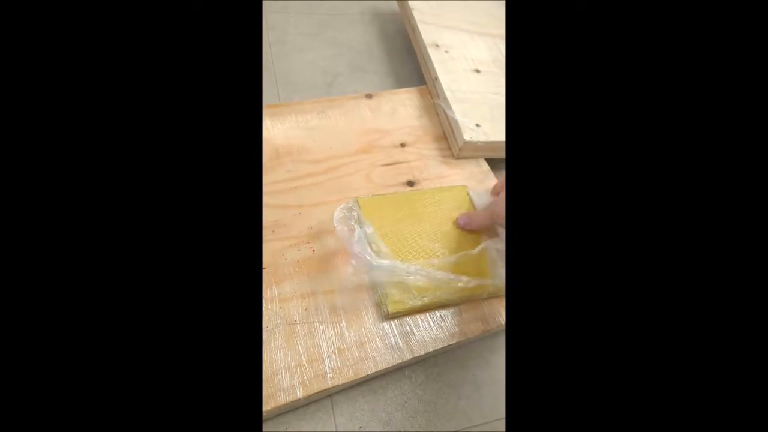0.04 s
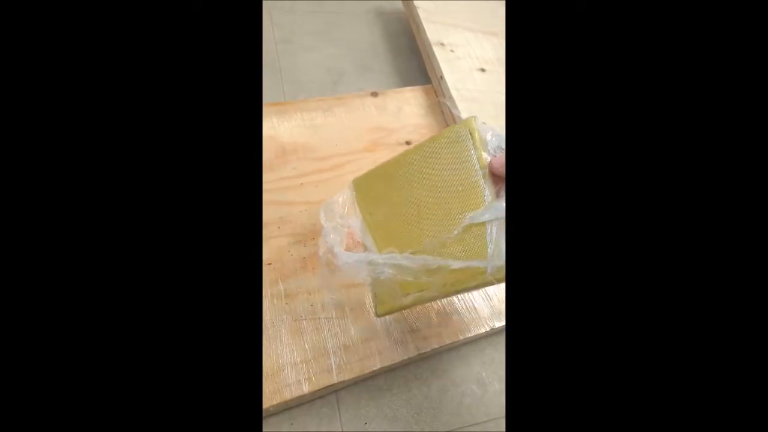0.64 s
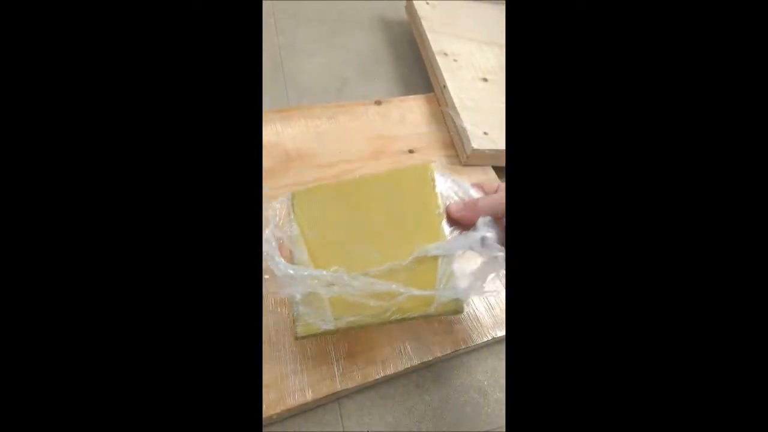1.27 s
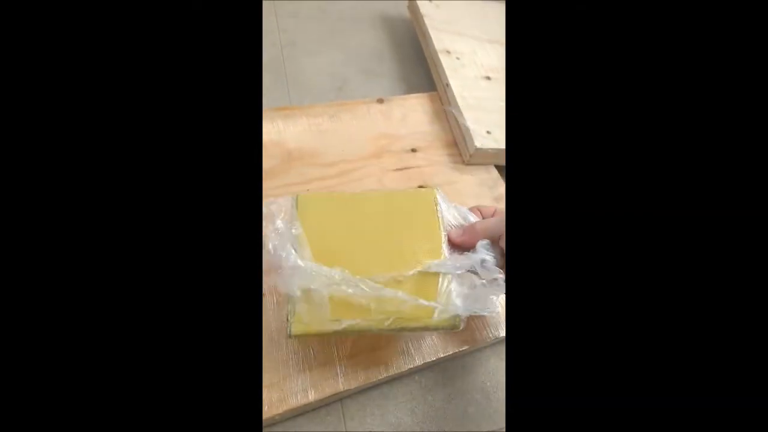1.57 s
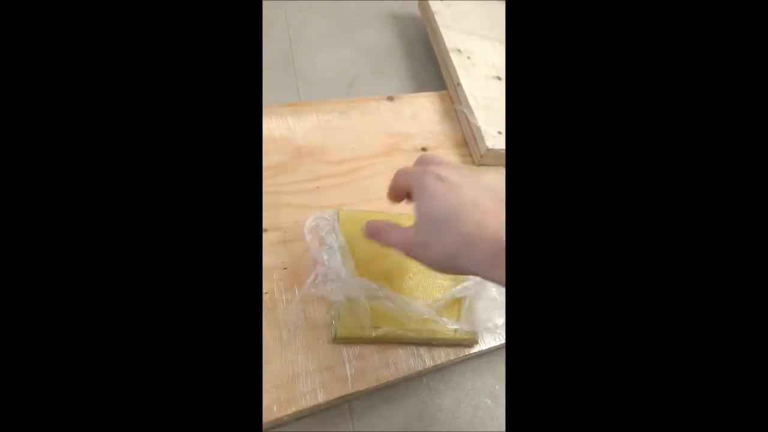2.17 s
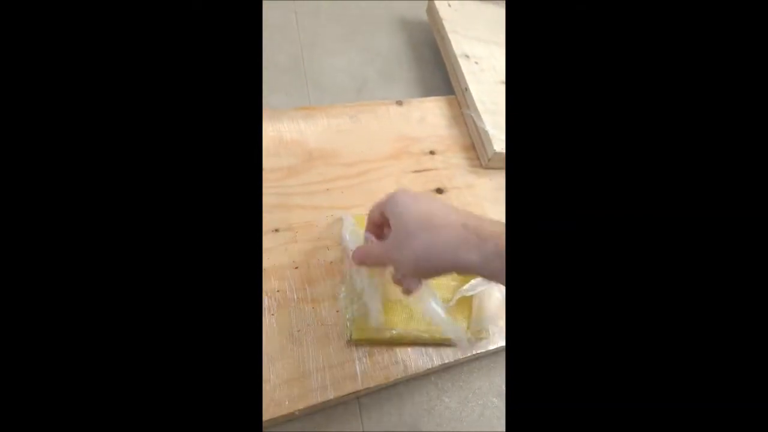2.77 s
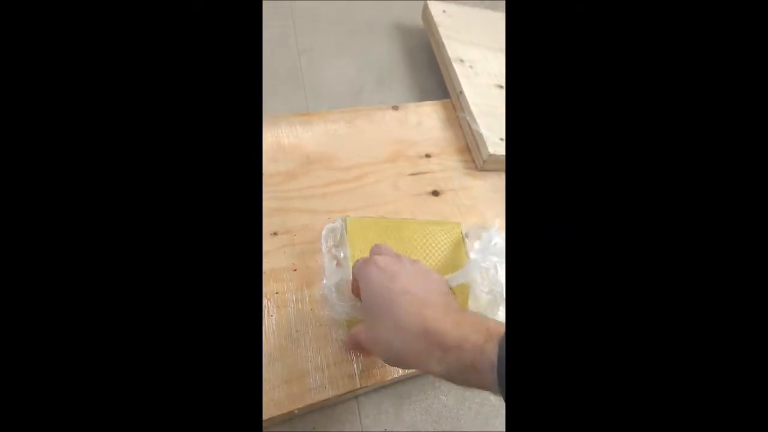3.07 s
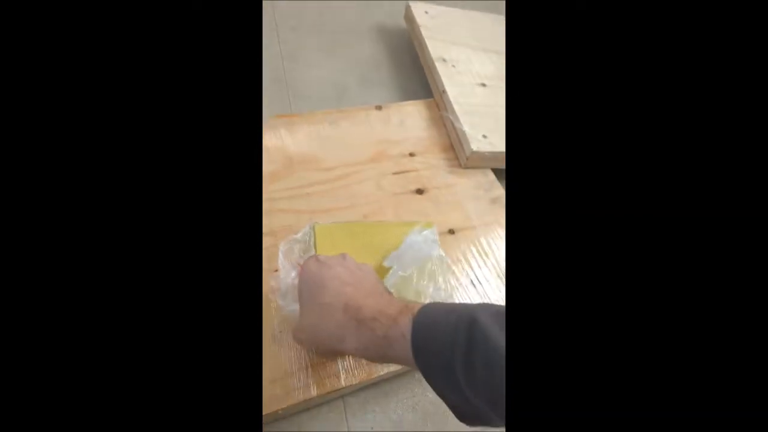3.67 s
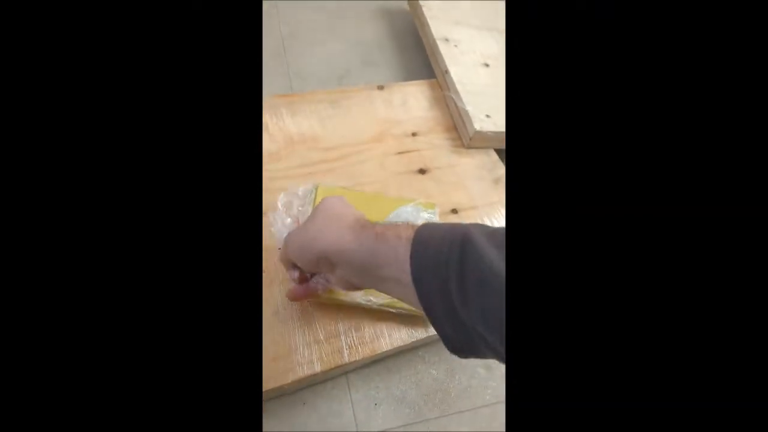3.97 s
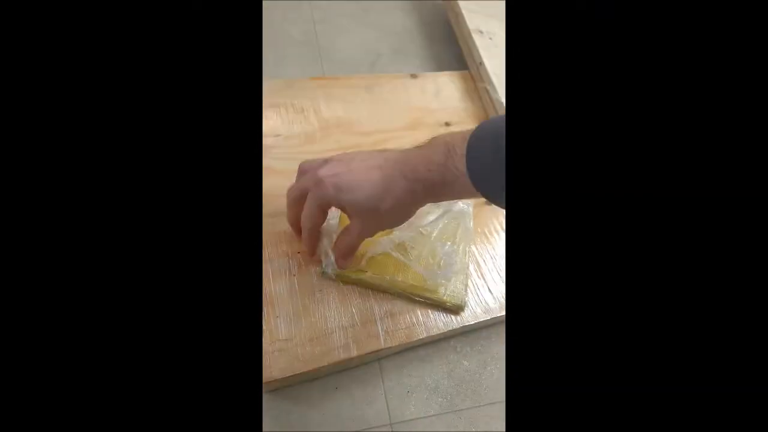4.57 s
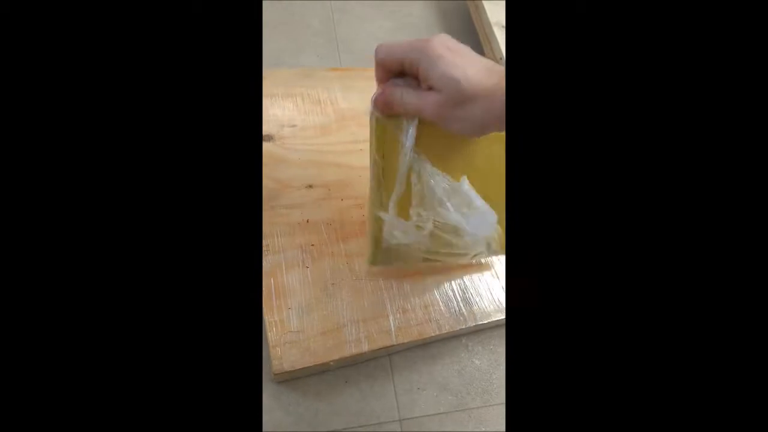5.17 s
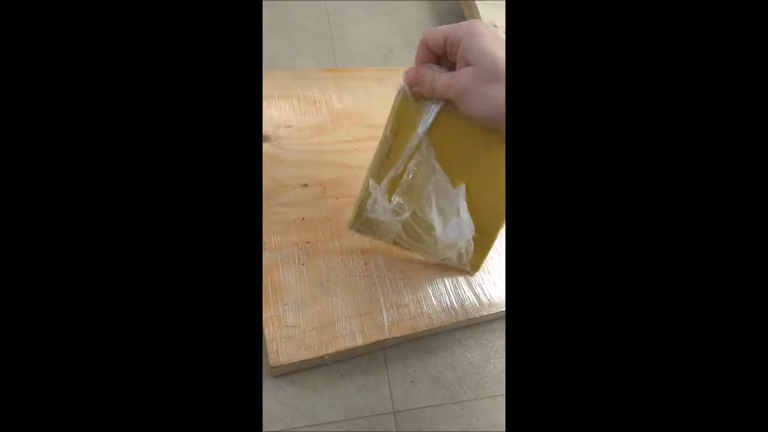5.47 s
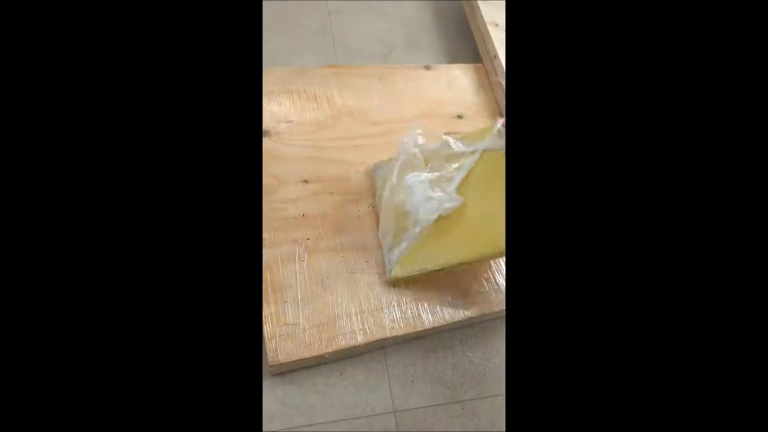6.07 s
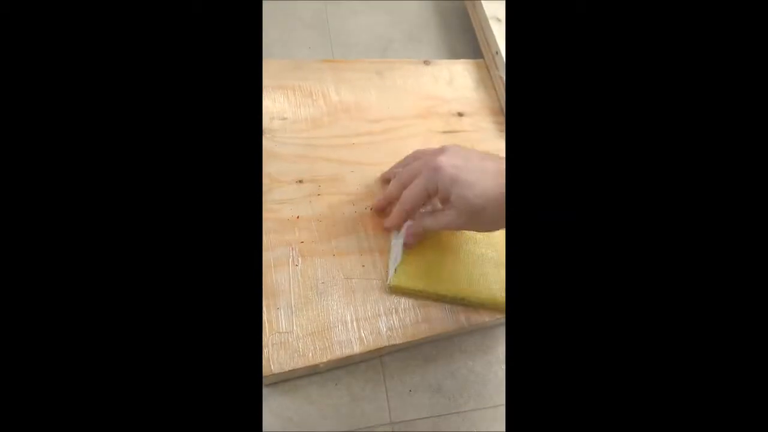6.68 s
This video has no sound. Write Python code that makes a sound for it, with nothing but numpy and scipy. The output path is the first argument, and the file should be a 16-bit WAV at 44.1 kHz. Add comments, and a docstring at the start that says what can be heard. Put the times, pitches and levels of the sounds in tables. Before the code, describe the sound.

Close crackling of cling film being pulled loose, with a hard slab sliding and thumping on wooden boards in a small workshop.

```python
"""Peeling cling film off a plate

A plywood bench in a small workshop, heard from close by through a pair of microphone ports.
Hands peel the film: its creases crackle and snap, and stuck patches rip loose in short bursts.
The hard plate slides, is turned over and knocks on the boards, and both ring. Behind it are
quick echoes from the walls, a short reverberation and a faint hum."""
import sys
import numpy as np
from scipy import signal
from scipy.fft import rfft, irfft
from scipy.io import wavfile
from scipy.ndimage import uniform_filter1d

SR = 44100
rng = np.random.default_rng(int(sys.argv[2]) if len(sys.argv) > 2 else 0)


def bounce(signal):
    """Save signal as a 16-bit WAV file at the path given by the first command-line argument."""
    frames = np.transpose(np.atleast_2d(signal))
    limited = np.clip(frames, -1, 1)
    pcm = np.round(limited * 32767).astype(np.int16)
    wavfile.write(sys.argv[1], SR, pcm)


N = 305172
TIME = np.arange(N) / SR
HZ = np.fft.rfftfreq(N, 1 / SR)


def gain_of(db):
    return 10 ** (np.asarray(db) / 20)


def unit_rms(x):
    return x / np.sqrt(np.mean(x ** 2) + 1e-20)


def unit_energy(x):
    return x / np.linalg.norm(x)


def read(points, hz):
    """Reads a table on a log-frequency axis."""
    f, value = np.transpose(points)
    return np.interp(np.log(hz + 1), np.log(f + 1), value)


def add(mix, s, sound):
    """Mixes a sound in at time s."""
    part = mix[max(round(s * SR), 0):][:len(sound)]
    part += sound[:len(part)]


def coloured(x, spectrum, size=2048):
    """Passes x through the shortest causal pulse with this spectrum; white noise keeps its power."""
    hz = abs(np.fft.fftfreq(size, 1 / SR))
    log_gain = np.log(gain_of(read(spectrum, hz)) + 1e-6)
    pulse = np.fft.ifft(np.exp(np.conj(signal.hilbert(log_gain)))).real[:size // 2]
    return signal.oaconvolve(x, unit_energy(pulse))[:len(x)]


def drift(rate_hz):
    """A slow random wander of rms 1."""
    steps = rng.standard_normal(4000)
    return unit_rms(np.interp(TIME * 2 * rate_hz, np.arange(len(steps)), steps))


def grains(per_s, spread_db, ring_s):
    """Tiny creases or slips at random moments, each a flutter of noise that dies at once."""
    sizes = gain_of(spread_db * np.minimum(rng.exponential(1, N), 5))
    sizes *= rng.random(N) < per_s / SR
    energy = signal.lfilter([1], [1, -np.exp(-2 / (ring_s * SR))], sizes ** 2 + 1e-9)
    return unit_rms(np.sqrt(energy) * rng.standard_normal(N))


def resonate(x, hz, width_hz):
    """A resonance of gain 1 that follows the curve hz."""
    turn = np.exp(2j * np.pi * np.cumsum(hz) / SR)
    pole = np.exp(-np.pi * width_hz / SR)
    return 2 * (turn * signal.lfilter([1 - pole], [1, -pole], x / turn)).real


# room tone, spectrum of the air: f/Hz, relative level/dB
AIR = [(20, 9.5), (50, -6), (110, -14), (400, 0), (1000, 0), (2800, -43), (5000, -4.5), (16000, -21)]
# room tone, partials of the hum: f/Hz, level/dB
HUM = [(116, -74), (238, -94), (406, -68), (531, -76.5)]

def room_tone(air_db=-63, waver_rad=2.4):
    """Faint workshop air with a wavering hum."""
    hum = sum(gain_of(db) * np.sqrt(2) * np.sin(2 * np.pi * hz * TIME + waver_rad * drift(5.7))
              for hz, db in HUM)
    return hum + gain_of(air_db) * coloured(rng.standard_normal(N), AIR)


# decay of the workshop: f/Hz, t60/s
ROOM_T60 = [(100, 0.065), (300, 0.46), (900, 0.48), (3000, 0.46), (8000, 0.26), (15000, 0.022)]

def room_tail():
    """Diffuse decay of the room, of energy 1; the middle range lasts longest."""
    t = np.arange(SR * 3 // 4) / SR
    hz, at, noise = signal.stft(rng.standard_normal(len(t)), SR, nperseg=256)
    decay = gain_of(-60 * at / read(ROOM_T60, hz)[:, None])
    tail = signal.istft(noise * decay, SR, nperseg=256)[1][:len(t)]
    onset = np.clip((t - .005) / 0.0021, 0, 1)
    return unit_energy(tail * onset)


def bench_reverb(x, count=3):
    """Reverberation of the bench; its pattern changes as the plate is moved about."""
    weights = np.cos(np.pi * (TIME + np.arange(count)[:, None] / count)) * np.sqrt(2 / count)
    return sum(signal.oaconvolve(x * weight, room_tail())[:N] for weight in weights)


def film_reverb(x):
    """Countless reflections blur the film into noise that dies band by band."""
    hz, at, bands = signal.stft(x, SR, nperseg=256)
    kept = gain_of(-60 * at[1] / read(ROOM_T60, hz)) ** 2  # share of power left after a frame
    power = [signal.lfilter([0, 0, 1 - k], [1, -k], abs(band) ** 2) for band, k in zip(bands, kept)]
    noise = signal.stft(rng.standard_normal(N), SR, nperseg=256)[2]
    return signal.istft(np.sqrt(power) * noise / noise.std(), SR, nperseg=256)[1][:N]


# first reflections at the microphone: delay/s, gain
ECHOES = [(0.011, 0.1), (0.0135, 0.3), (0.0174, 0.23), (0.0205, 0.4), (0.032, 0.2)]

def echoes(x, sway_s=0.000484):
    """First echoes from bench and walls; their paths sway as the hands move."""
    sway = sway_s * drift(2)
    return sum(gain * np.interp(TIME - s - (-1) ** k * sway, TIME, x)
               for k, (s, gain) in enumerate(ECHOES))


# hand and plate sliding over the bench: t/s, level/dB
SLIDE = [(0.0, -59), (0.3, -58), (0.56, -63.5), (1.15, -53), (1.33, -54), (1.48, -78), (1.75, -56),
         (1.91, -53.5), (2.37, -51.5), (2.58, -57), (2.95, -54), (3.39, -50), (4.64, -47.5), (4.93, -52),
         (5.39, -50.5), (5.72, -59), (5.97, -61), (6.24, -50.5), (6.49, -53), (6.92, -59)]
# spectrum of the rubbing: f/Hz, relative level/dB
RUB = [(30, -29), (75, -1.5), (130, 4.5), (240, 2), (450, -6), (800, -3.5), (1400, -7.5), (2600, -4),
       (6000, -41.5)]
# bench resonances under the rubbing: f/Hz, width/Hz, gain/dB
DRONES = [(132, 7.1, -1.5), (245.8, 10.5, 10.5), (407, 86, 4), (522, 18, 6.5), (740, 27, 2)]

def slide():
    """Tiny slips of hand and plate sound through the bench and keep its resonances droning."""
    slips = grains(per_s=1500, spread_db=0, ring_s=0.00066)
    rub = gain_of(np.interp(TIME, *np.transpose(SLIDE))) * coloured(slips, RUB)
    return rub + sum(gain_of(db) * signal.lfilter(*signal.iirpeak(hz, hz / width, SR), rub)
                     for hz, width, db in DRONES)


# plate and bench ringing together: f/Hz, relative level/dB, t60/s
BENCH_MODES = [(81, 2, 0.68), (114.7, 6, 0.17), (138.8, 4, 0.17), (188, 4.5, 0.17), (210.8, -1, 0.22),
               (245.4, -2.5, 0.13), (314.3, 2.5, 0.078), (361, 22, 0.017), (475, -1.5, 0.16),
               (519, 9, 0.11), (680, -19, 0.048), (770, -16, 0.11), (846, -4, 0.24), (949, 13.5, 0.071),
               (1124, -3, 0.038), (1214, 13, 0.061), (1384, 11, 0.061), (1640, -16, 0.035),
               (2060, 3, 0.046), (2160, -25, 0.048), (2610, 9, 0.036), (2873, 23.5, 0.013),
               (3220, 19, 0.0087), (3695, 24, 0.039), (4120, 7, 0.018)]

def bench_ring(t):
    """Struck modes die away; the spot struck and the grip shift their share and pitch a little."""
    hz, db, t60 = np.transpose(BENCH_MODES)[:, :, None]
    share_db = rng.standard_normal(hz.shape)
    detune = 0.015 * rng.standard_normal(hz.shape)
    sign = np.where(hz < 345, -(-1) ** np.arange(len(hz))[:, None], 1)  # low modes alternate down and up
    modes = sign * gain_of(db + share_db - 60 * t / t60) * np.sin(2 * np.pi * hz * (1 + detune) * t)
    return unit_energy(modes.sum(0))


# spectrum of a contact with the plate: f/Hz, relative level/dB
CONTACT = [(40, -45), (120, -5), (300, 8), (900, 5), (1300, 3), (1800, 11.5), (2700, -1.5), (3400, -16.5),
           (4400, -21), (5400, -14), (7500, -8.5), (16000, -19.5)]
# spectrum of the rattling boards: f/Hz, relative level/dB
RATTLE = [(60, -15), (150, -1), (450, 0.5), (900, -6.5), (1300, -3.5), (1800, -1.5), (2300, 4.5),
          (3200, -23), (4400, -19), (6000, -19), (16000, -48)]
# the plate meets the bench, levels before their trims:
# t/s, thump/dB, clack/dB, edge click/dB, hard crack/dB, thump f/Hz, clack f/Hz
KNOCKS = [(.047, -52, -44, -43.5, -69, 175, 820), (.118, -67, -46, -42.5, -65, 179, 900),
          (1.4021, -27, -38.5, -47, -57, 179.4, 570), (1.7302, -23.5, -24.5, -23.5, -24.5, 188, 920),
          (1.915, -50, -43, -32, -58, 172, 1320), (2.0345, -21, -17, -18, -26.5, 146, 1096),
          (2.325, -39.5, -44.5, -64, -73, 162, 377), (2.522, -53, -38.5, -29.5, -55, 186, 920),
          (3.523, -37.5, -36, -38, -57, 161, 372), (3.66, -36.5, -57, -55, -60, 161, 1010),
          (4.136, -16.5, -21.5, -28.5, -36, 181, 680), (4.409, -53, -35.5, -39.5, -36, 180, 486),
          (5.142, -38, -48, -47, -65, 160, 710), (5.319, -26.5, -43, -62, -61, 166, 640),
          (5.56, -41.5, -70, -61, -70, 233, 603), (5.992, -28.5, -39.5, -36, -61, 171.4, 755),
          (6.109, -36.5, -37.5, -61, -59, 176, 770), (6.324, -20.5, -19.5, -16, -21, 177.5, 1124),
          (6.712, -37, -44.5, -37.5, -66, 206, 415)]

def knocks(trims_db=(28, 30, 30, 30), note_db=24, note_rise_s=0.0054, note_t60=0.15,
           contact_db=-2, rattle_db=-6, rattle_t60=0.19):
    """A blow is a contact pulse, ringing modes, a rattle of boards and a wooden note."""
    t, out = np.arange(SR // 3) / SR, np.zeros(N)
    contact = gain_of(contact_db) * coloured(signal.unit_impulse(len(t)), CONTACT)
    boards = coloured(rng.standard_normal(N), RATTLE)
    note_envelope = (1 - np.exp(-t / note_rise_s)) * gain_of(-60 * t / note_t60)
    for s, *levels_db, thump_hz, clack_hz in KNOCKS:
        rattle = np.roll(boards, rng.integers(N))[:len(t)] * gain_of(-60 * t / rattle_t60)
        blow = bench_ring(t) + contact + gain_of(rattle_db) * unit_energy(rattle)
        # a flat landing wakes the low modes, a hard edge the high ones
        bands_hz = [(thump_hz / 1.453, thump_hz * 1.453), (clack_hz / 1.71, clack_hz * 1.25),
                    (1200, 3600), (3500, 6000)]
        for band, db, trim_db in zip(bands_hz, levels_db, trims_db):
            part = signal.sosfilt(signal.butter(2, band, "bandpass", fs=SR, output="sos"), blow)
            add(out, s, gain_of(db + trim_db) * unit_energy(part))
        note = np.sin(2 * np.pi * thump_hz * t) * note_envelope
        add(out, s, gain_of(levels_db[0] + note_db) * unit_energy(note))
    return out


# the long peel, one unbroken pull: t/s, crackle/dB, fizz/dB, sizzle/dB, taut ring/dB
PEEL = [(2.392, -45.5, -56, -49, -57), (2.572, -44.5, -55, -52, -61), (3.0, -56.5, -62.5, -56, -62),
        (3.45, -39.5, -50.5, -45, -74), (3.59, -45, -50, -43.5, -68), (3.83, -37, -50, -43.5, -50),
        (3.99, -55, -56.5, -47, -48), (4.23, -42.5, -54.5, -50.5, -72), (4.51, -54.5, -54.5, -48, -35.5),
        (4.67, -44, -50, -45.5, -40), (4.88, -52.5, -51.5, -52.5, -47), (4.98, -47.5, -53.5, -47, -75),
        (5.118, -52, -45.5, -42, -38), (5.24, -51.5, -64, -52.5, -77), (5.62, -59, -65, -59.5, -89)]
# loose film as the plate is lifted, turned or gripped: t/s, length/s, crackle/dB, fizz/dB
RUSTLES = [(-0.05, 0.81, -49.5, -59.5), (0.505, 0.23, -69, -65), (1.111, 0.61, -54.5, -63.5),
           (1.827, 0.31, -43, -54.5), (6.19, 0.19, -45.5, -55), (6.452, 0.2, -46, -58.5),
           (6.802, 1, -36, -47)]

def handling(fade_db_per_s=252, rest_crackle_db=-65.5, rest_fizz_db=-73.5):
    """Gains of crackle, fizz, sizzle and ring: the peel drives all, rustles and settling the first two."""
    s, *columns = np.transpose(PEEL)
    outside_s = abs(TIME - np.clip(TIME, s[0], s[-1]))  # time before or after the pull
    peel = gain_of([np.interp(TIME, s, db) - fade_db_per_s * outside_s for db in columns])
    loose = np.hypot(peel[:2], gain_of([[rest_crackle_db], [rest_fizz_db]]))
    for start, length, *levels_db in RUSTLES:
        progress = np.clip((TIME - start) / length, 0, 1)
        swell = np.sin(np.pi * progress ** 0.53)  # rises faster than it dies
        loose = np.hypot(loose, np.outer(gain_of(levels_db), swell))
    return *loose, *peel[2:]


def folds(x, patchy_db, span_hz=600, span_s=0.03):
    """Each cluster of creases sits on another fold of the film, with its own colour."""
    hz, at, bands = signal.stft(x, SR, nperseg=256)
    patches = uniform_filter1d(rng.standard_normal(bands.shape), max(round(span_hz / hz[1]), 1), 0)
    patches = unit_rms(uniform_filter1d(patches, max(round(span_s / at[1]), 1), 1))
    bands *= gain_of(patchy_db * np.clip(patches, -2, 2))
    return unit_rms(signal.istft(bands, SR, nperseg=256)[1][:N])


# spectra of the film at close range: f/Hz, relative level/dB
CRACKLE = [(50, -23), (150, -20), (500, -12.5), (1300, -9.5), (2000, 3), (2800, 1), (3900, 4.5), (5200, -8),
           (7400, -7.5), (8800, -29), (12000, -31), (16000, -28)]  # creases flipping
FIZZ = [(2000, -76), (6000, -2), (9000, 6.5), (11000, 3), (13000, 6), (15500, 1.5)]  # the finest creases
SIZZLE = [(3000, -52.5), (5000, -1), (6200, 13.5), (7800, 3.5), (9000, -6.5), (12000, -38.5)]  # film coming unstuck

def crinkle(crackle_db=1, fizz_db=3.5, sizzle_db=-0.5, taut_db=-3, taut_hz=2780, taut_width_hz=1050,
            clump_db=3.5, stray_db=-9):
    """Clumps of creases and stray larger ones follow the hands; pulled film sizzles and rings taut."""
    crackle, fizz, sizzle, taut = handling()
    fine = grains(per_s=1700, spread_db=1, ring_s=0.00023)
    clumps = unit_rms(fine * gain_of(clump_db * drift(35)))
    strays = gain_of(stray_db) * grains(per_s=110, spread_db=-1, ring_s=0.0007)
    creases = folds(clumps + strays, patchy_db=4.5)
    pitch = taut_hz * (1 + 0.01 * drift(12))  # wavers slightly at random
    ringing = unit_rms(resonate(resonate(creases, pitch, taut_width_hz), pitch, 2 * taut_width_hz))
    layers = [(crackle_db, crackle, CRACKLE), (fizz_db, fizz, FIZZ), (sizzle_db, sizzle, SIZZLE)]
    crackling = sum(gain_of(db) * gain * coloured(creases, colour) for db, gain, colour in layers)
    return crackling + gain_of(taut_db) * taut * ringing


# stuck film ripping loose: t/s, level/dB, length/s, rise/s,
# then relative to its crackle: fizz/dB, sizzle/dB, plate resonance/dB
RIPS = [(0.085, -27.5, 0.011, 0.007, -11, -18, -13), (1.499, -48, 0.04, 0.0028, -5, -7, -32),
        (1.903, -41, 0.011, 0.0048, -24, -20, -12), (2.505, -28.5, 0.037, 0.019, -9, -3, -28),
        (3.147, -39, 0.041, 0.0066, -9, -2, -35), (3.437, -39, 0.033, 0.0046, -23, -1, -17),
        (3.534, -54, 0.037, 0.015, 9, 0, -17), (3.641, -26, 0.027, 0.0015, -12, -10, -44),
        (3.862, -32.5, 0.076, 0.023, -8, -4.5, -36), (4.731, -44.5, 0.04, 0.011, 1.5, -15, -20),
        (4.761, -33, 0.023, 0.015, -9, -15, -3), (5.036, -40, 0.16, 0.062, -6.5, -13, -25),
        (5.512, -41, 0.019, .014, -2, -5, -2), (6.108, -46, 0.048, 0.007, -4.5, -3, -4),
        (6.683, -38.5, 0.097, 0.018, -10, -14.5, -9.5)]

def rips(trim_db=3):
    """A rip is an avalanche of creases that builds up and runs out; taut film also drives the plate."""
    out = np.zeros(N)
    creases = folds(grains(per_s=1700, spread_db=2.5, ring_s=0.0007), patchy_db=2)
    crackle, *extras = (coloured(creases, colour) for colour in (CRACKLE, FIZZ, SIZZLE, CONTACT))
    for s, db, length, rise_s, *shares_db in RIPS:
        t = np.arange(int(2 * length * SR)) / SR
        at = (int(s * SR) + np.arange(len(t))) % N
        burst = crackle[at] + sum(gain_of(share) * extra[at] for share, extra in zip(shares_db, extras))
        envelope = np.minimum(t / rise_s, 1) * np.exp(-(t / length) ** 2)
        add(out, s, gain_of(db + trim_db) * burst * envelope)
    return out


def crease(ring_s=0.00094, flutter_db=2, size=256):
    """One crease flips: a click and a brief flutter of the film around it."""
    flutter = rng.standard_normal(size) * np.exp(-np.arange(size) / SR / ring_s)
    return unit_energy(signal.unit_impulse(size) + gain_of(flutter_db) * unit_energy(flutter))


# spectra of a snap, its body and its top treble: f/Hz, relative level/dB
SNAP_BODY = [(50, -13), (500, -11), (1300, -6), (2000, 0), (2900, 5.5), (3900, 5), (5200, -9), (7400, -7.5),
             (8800, -28), (16000, -36)]
SNAP_TOP = [(2000, -88), (5000, 10.5), (8000, 9), (11000, 6), (13000, 4.5), (15500, 6)]
# the loudest creases, levels before their trims: t/s, level/dB, relative top treble/dB
SNAPS = [(0.117, -33, -18), (0.156, -36.5, -5.5), (0.2593, -31, -16.5), (0.3034, -34, -14),
         (0.3495, -28, -32), (0.4198, -34, -24), (0.5931, -39, -20), (0.896, -43.5, -5), (0.9323, -43, -15),
         (1.147, -33, -23), (1.2155, -35, -11), (1.3388, -26.5, -14), (1.4003, -26.5, -24),
         (1.4965, -23.5, -15), (1.73, -22, -17.5), (1.823, -39, -11), (1.925, -28, -34), (2.414, -42, -18),
         (2.4931, -28, -12), (2.498, -25.5, -9.5), (2.524, -22, -11), (2.5373, -11, -27), (2.706, -34, -25),
         (2.8391, -25.5, -28), (3.056, -31, -17), (3.0717, -30.5, -15), (3.1674, -24, -16),
         (3.397, -25, -16), (3.4456, -27.5, -7), (3.4864, -38, -22), (3.566, -36.5, 0), (3.6184, -39, 0),
         (3.646, -23, -13), (3.65, -17.5, -23), (3.748, -29, -20),(3.766, -26, -13), (3.891, -19, -20),
         (3.921, -20.5, -11.5), (4.051, -32, -19), (4.0577, -30, -6), (4.0865, -32, -23), (4.41, -27, -28),
         (4.521, -29, -10.5), (4.6636, -23.5, -37), (4.7728, -21, -26), (4.8291, -34.5, -8),
         (4.8763, -30, -11), (4.8937, -35, -9), (5.312, -33.5, -13), (5.531, -35.5, -10), (5.537, -28, -23),
         (5.6763, -39.5, -8), (5.7162, -28, -11), (5.8642, -42, -20), (5.992, -23, -22),
         (6.1189, -28, -21.5), (6.299, -26.5, -42), (6.322, -32, -12), (6.563, -37, -23),
         (6.712, -20.5, -43), (6.7324, -29, -27),]

def snaps(trim_db=17, top_trim_db=11, ring_hz=3240, ring_width_hz=500):
    """Large creases snap over: the top of the crack leaves at once, the body rings for a millisecond."""
    out = np.zeros(N)
    body, top = (coloured(signal.unit_impulse(1024), colour) for colour in (SNAP_BODY, SNAP_TOP))
    poles = signal.iirpeak(ring_hz, ring_hz / ring_width_hz, SR)[1]
    body = signal.lfilter(poles[::-1], poles, body)  # all-pass: the film holds this range a few cycles
    for s, db, top_db in SNAPS:
        crack = body + gain_of(top_db + top_trim_db) * top
        add(out, s, gain_of(db + trim_db) * np.convolve(crease(), crack))
    return out


# how alike the two channels sound: f/Hz, likeness/0-1
LIKENESS = [(100, 0.031), (900, 0.37), (1500, 0.19), (3000, 0.65), (6000, 0.034), (10000, 0.23),
            (15000, 0.17)]
# phase between the channels on top of their time lag: f/Hz, phase/rad
WIDENING_PHASE = [(20, .3), (200, 1.05), (550, 1.5), (800, 2.35), (1100, 3.3), (1450, 3.85), (1800, 3.14)]

def widen(near, reverb, lag_s=0.000558):
    """Stereo widening: near sound is delayed and phase-turned on the left, reverb on the right."""
    likeness = np.clip(read(LIKENESS, HZ), 0, 1)
    main = np.sqrt((1 + likeness) / 2) * rfft(near)
    ambient = np.sqrt((1 - likeness) / 2) * rfft(reverb)
    turn = np.exp(1j * (read(WIDENING_PHASE, HZ) - 2 * np.pi * HZ * lag_s))
    return irfft(np.array([main * turn + ambient, main + ambient * turn]), N)


def scene(snap_send_db=-6, film_wet_db=-7, bench_wet_db=-9.5, boom_db=-10, level_db=-1):
    """Film and plate close to the microphone, with the workshop around them."""
    crinkling, ripping, snapping, bench = crinkle(), rips(), snaps(), knocks() + slide()
    film_send = crinkling + ripping + gain_of(snap_send_db) * snapping  # what goes into the room
    near = crinkling + ripping + snapping + echoes(0.95 * crinkling + 0.85 * ripping + 0.68 * snapping)
    near += gain_of(film_wet_db) * film_reverb(film_send) + room_tone()
    # small surfaces reflect little bass
    clatter = signal.lfilter(*signal.butter(2, 330, "highpass", fs=SR), bench)
    near += bench + 0.56 * echoes(clatter) + gain_of(bench_wet_db) * bench_reverb(bench)
    stereo = widen(near, film_reverb(film_send))
    bass = signal.lfilter(*signal.butter(2, 450, fs=SR), bench)
    boom = gain_of(boom_db) * bench_reverb(bass)  # the room's boom differs between the channels
    return gain_of(level_db) * (stereo + np.array([boom, -boom]))


def record(dry, low_cut_hz=35, high_cut_hz=15900):
    """The recorder cuts the deep bass and the top treble."""
    low_cut = signal.butter(2, low_cut_hz, "highpass", fs=SR, output="sos")
    high_cut = signal.firwin(301, high_cut_hz, window=("kaiser", 8), fs=SR)
    return signal.oaconvolve(signal.sosfilt(low_cut, dry), high_cut[None], "same")


dry = scene()
out = record(dry)
bounce(out)
```